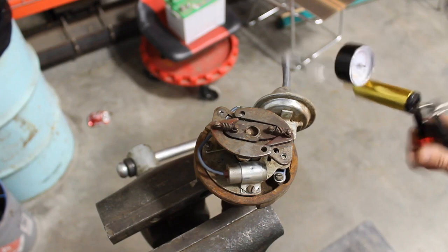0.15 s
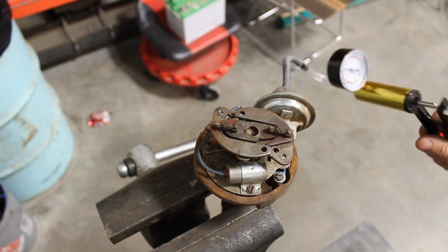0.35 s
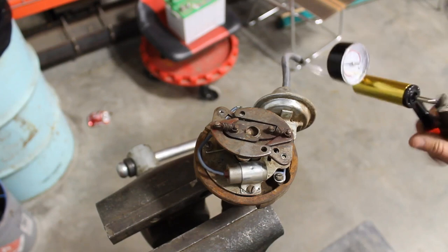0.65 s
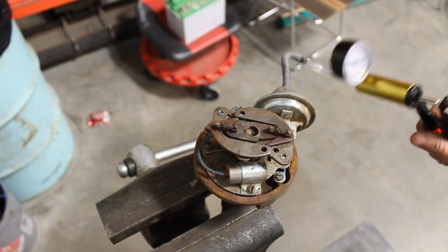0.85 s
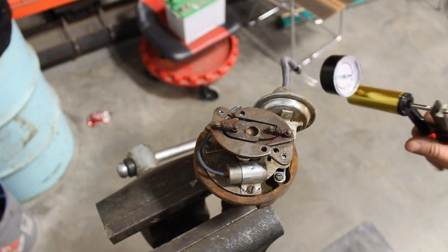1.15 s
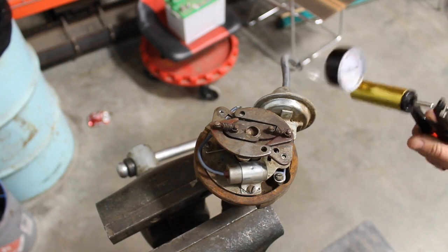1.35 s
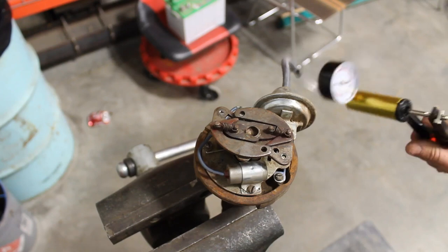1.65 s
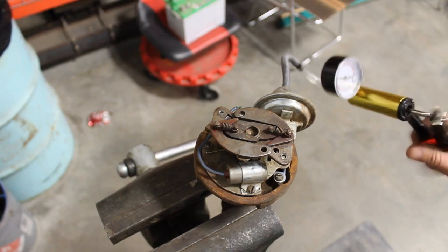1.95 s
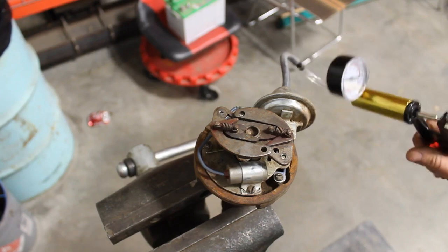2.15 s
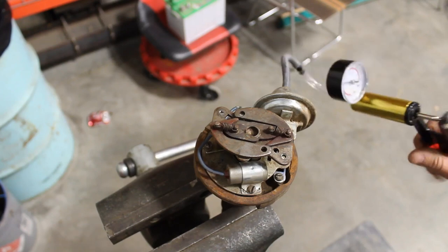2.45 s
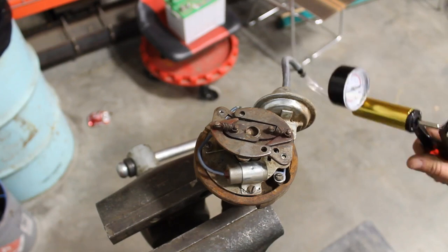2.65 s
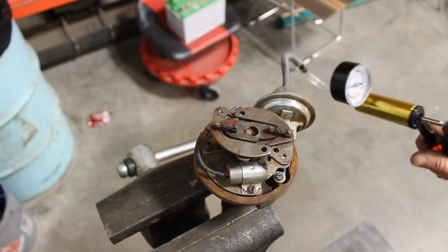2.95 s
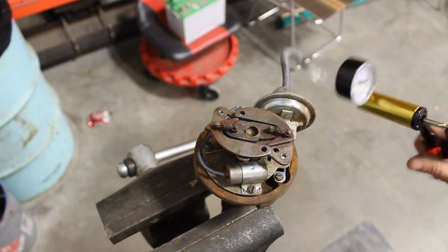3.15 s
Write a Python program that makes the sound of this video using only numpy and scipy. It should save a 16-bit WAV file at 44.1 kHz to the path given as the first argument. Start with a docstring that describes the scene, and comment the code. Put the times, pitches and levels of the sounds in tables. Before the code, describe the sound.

A pistol-grip hand vacuum pump is worked about four times a second: steel handle clack, loud low venting pop, then a small knock, tick and gritty rattle on return. Close microphone, hard-walled workshop, faint hum.

```python
"""A pistol-grip hand vacuum pump is squeezed about four times a second over quiet workshop hum and hiss.
Each squeeze clacks the steel handle, modelled as impulses and chattering contacts through resonances.
The piston then vents: a low pop from the slope of an air puff, with a short hoot around it.
On the way back come a small knock of the same kind, a band-limited valve tick and a slide of rattling grit.
Near surfaces return discrete echoes, the walls a noise tail."""
import sys
import numpy as np
from scipy import signal
from scipy.fft import rfft, irfft, next_fast_len
from scipy.io import wavfile
from scipy.ndimage import map_coordinates

SR = 44100
rng = np.random.default_rng(int(sys.argv[2]) if len(sys.argv) > 2 else 0)


def pcm_store(signal):
    """Save signal as 16-bit PCM."""
    levels = np.round(np.clip(np.atleast_2d(signal), -1, 1) * 32767)
    wavfile.write(sys.argv[1], SR, levels.astype(np.int16).T)


N = 145530

# Venting pops. Each row: puff time in seconds, pop level in dB, puff width in seconds, hoot level in dB,
# hoot pitch after its glide in Hz, hoot lead over the puff time in seconds.
VENT_POPS = [(0.2025, -3.5, 0.00042, -16, 1150, .003), (0.4724, -1.5, 0.00035, -25.5, 1100, 0.0035),
             (0.7421, -2.5, 0.00034, -23.5, 1126, 0.0076), (1.0029, -1, 0.00033, -16.5, 1114, 0.005),
             (1.2571, -1, 0.00032, -21.5, 1085, 0.0032), (1.5117, -1, 0.00031, -23.5, 1103, 0.0078),
             (1.776, -1, 0.00033, -24.5, 1055, 0.0027), (2.0425, -1.5, 0.00035, -16.5, 1120, 0.0038),
             (2.2958, -1, 0.00032, -21, 1154, 0.0038), (2.5449, 0.5, 0.00031, -10.5, 1133, 0.0029),
             (2.8116, -1, 0.00034, -21, 1106, 0.0058), (3.0712, -1, 0.00031, -24, 1055, 0.0018)]


def amp(db):
    """Gain of a level in dB."""
    return 10 ** (np.asarray(db) / 20)


def unit(x):
    """Scale to rms 1."""
    return x / np.sqrt(np.mean(x ** 2) + 1e-20)


def along(points, hz):
    """Interpolate (Hz, value) points on a log frequency axis."""
    point_hz, values = np.transpose(points)
    return np.interp(np.log(hz + 1), np.log(point_hz + 1), values)


def filtered(x, response):
    """Apply a complex response of frequency to x."""
    m = next_fast_len(N + SR // 2)
    spectrum = rfft(x, m) * response(np.fft.rfftfreq(m, 1 / SR))
    return irfft(spectrum, m)[..., :N]


def bandpass(hz, centre_hz, width_hz):
    """Response of a damped resonance, 1 at its centre."""
    return 1j * hz * width_hz / (centre_hz ** 2 - hz * hz + 1j * hz * width_hz)


def resonances(peaks):
    """One response per (Hz, width in Hz, dB) row; their joint answer to a unit blow peaks at 1."""
    def bank(hz):
        return np.array([(-1) ** k * amp(db) * bandpass(hz, centre_hz, width_hz)
                         for k, (centre_hz, width_hz, db) in enumerate(peaks)])

    unit_blow = np.arange(N) == 0
    top = np.abs(filtered(unit_blow, bank).sum(0)).max()
    return lambda hz: bank(hz) / top


def ringing(x, peaks):
    """Sum resonances driven by shared blows or one excitation each; soft contacts excite less treble."""
    contact_hz = 10260
    rung = filtered(x, resonances(peaks)).sum(0)
    return filtered(rung, lambda hz: 1 / (1 + 1j * hz / contact_hz) ** 4)


def blows(rows, db):
    """One impulse per (seconds, dB) row, all raised by db."""
    x = np.zeros(N)
    for s, level_db in rows:
        x[round(s * SR)] += amp(level_db + db)
    return x


def grit(rate_per_s, clump_db, count):
    """Tiny contacts at random moments, in clumps, partly shared by count resonances."""
    clump_rate_hz = 540
    own = 0.43  # power share of the grit that each resonance has to itself
    z = rng.standard_normal((count + 1, N)) * (rng.random((count + 1, N)) < rate_per_s / SR)
    clumps = map_coordinates(rng.standard_normal(N // 40), [np.arange(N) * clump_rate_hz / SR])
    contacts = np.sqrt(own) * z[1:] + np.sqrt(1 - own) * z[0]
    return unit(amp(clump_db * clumps) * contacts)


def shop():
    """Background: shaped noise as hiss and rumble, plus hum tones of wavering level."""
    # Noise spectrum. Each row: frequency in Hz, relative density in dB per Hz.
    spectrum = [(15, -39), (25, -0.5), (152, -2.5), (390, -1.5), (1000, -8.5), (1080, -10.5), (1380, -2),
                (1540, -8.5), (3550, -13), (4280, -11.5), (7540, -18.5), (15600, -38)]
    # Noise level. Each row: time in seconds, rms level in dB.
    noise_level = [(0.0, -43), (0.63, -47.5), (1.96, -43), (2.4, -46.5), (2.47, -45.5), (3.04, -46),
                   (3.15, -45), (3.3, -48)]
    # Hum tones. Each row: frequency in Hz, nominal level in dB.
    hum_tones = [(119, -53.5), (238, -58.5)]
    t = np.arange(N) / SR
    noise = unit(filtered(rng.standard_normal(N), lambda hz: amp(along(spectrum, hz))))
    waver = map_coordinates(rng.standard_normal(40), [t * 8])  # 8 random points a second
    hum = sum(amp(db + 1.5 + 2 * waver) * np.sin(2 * np.pi * hz * t) for hz, db in hum_tones)
    return amp(np.interp(t, *np.transpose(noise_level))) * noise + hum


def room(x):
    """Noise tail whose frequencies die at their own speeds, redrawn every quarter second."""
    # Wall absorption. Each row: frequency in Hz, 60 dB decay time in seconds.
    wall_t60 = [(150, 0.57), (500, 0.26), (1200, 0.99), (3000, 0.74), (6000, 0.28), (12000, 0.6)]
    step, shift, delay = SR // 4, 3000, 350  # samples
    out = np.zeros(N + SR)
    for i in range(0, N, step):
        hz, t, z = signal.stft(rng.standard_normal(SR // 2), SR, nperseg=256)
        decay = amp(-60 * t / along(wall_t60, hz)[:, None])
        tail = signal.istft(z * decay, SR, nperseg=256)[1]
        start = max(i - shift, 0)
        wet = signal.fftconvolve(x[start:i + step - shift], tail / np.linalg.norm(tail))
        j = start + delay
        out[j:j + len(wet)] += wet
    return out[:N]


def valve():
    """Tiny bright ticks: impulses passed twice through one band."""
    # Valve ticks. Each row: time in seconds, relative level in dB.
    tick_rows = [(0.091, -37), (0.3431, -37), (0.4544, -42), (0.6125, -34), (0.7193, -42), (0.8764, -36),
                 (1.1278, -36), (1.2364, -50), (1.3848, -37), (1.644, -38), (1.9051, -52), (2.0183, -33),
                 (2.177, -42), (2.4114, -39), (2.6843, -43), (2.9362, -39), (3.0435, -44), (3.2004, -37)]
    tick_db, tick_hz, width_hz = 18, 10900, 2300
    once = ringing(blows(tick_rows, tick_db), [(tick_hz, width_hz, 0)])
    return filtered(once, lambda hz: bandpass(hz, tick_hz, width_hz))


def slide():
    """Return slide: grit under a smooth stroke and rod rattles ring in the barrel."""
    # Return strokes. Each row: middle in seconds, relative level in dB, Gaussian half length in seconds.
    stroke_rows = [(0.084, -40, 0.014), (0.36, -36, 0.012), (0.617, -37.5, 0.016), (.888, -34.5, 0.016),
                   (1.143, -31.5, 0.0099), (1.397, -31.5, 0.014), (1.658, -28.5, .01),
                   (1.914, -31.5, 0.016), (2.191, -38.5, 0.0095), (2.42, -30.5, 0.013), (2.687, -38, 0.023),
                   (2.95, -29, 0.0097), (3.209, -37.5, 0.021)]
    # Loudest rattles of the loose piston rod. Each row: time in seconds, level in dB.
    rattle_rows = [(0.0823, -30), (0.356, -31), (0.3606, -25), (0.6267, -24.5), (0.8859, -22.5),
                   (0.8944, -25), (1.1416, -19.5), (1.3977, -24), (1.6474, -30), (1.6516, -28),
                   (1.657, -26), (1.911, -29), (1.9236, -26), (2.1914, -29), (2.4238, -20), (2.4313, -33),
                   (2.6894, -22.5), (2.6988, -28.5), (2.9407, -32), (2.9504, -39), (3.2025, -25),
                   (3.2191, -30.5)]
    # Barrel resonances. Each row: frequency in Hz, width in Hz, relative level in dB.
    barrel_peaks = [(1100, 370, -11), (1720, 660, -14), (2630, 390, -6), (3010, 155, -2), (3570, 300, -2.5),
                    (4670, 160, -2.5), (5740, 193, 0), (7380, 1750, -10.5), (9600, 1900, -17.5),
                    (11800, 700, -14.5)]
    slide_db, contacts_per_s, clump_db = -12.5, 1500, 3
    t = np.arange(N) / SR
    stroke = sum(amp(db + slide_db) * np.exp(-.5 * ((t - s) / half_s) ** 2)
                 for s, db, half_s in stroke_rows)
    scrape = stroke * grit(contacts_per_s, clump_db, count=len(barrel_peaks))
    return ringing(blows(rattle_rows, 0) + scrape, barrel_peaks)


def handle():
    """Each clack strikes the steel, which chatters on; each pop shakes it again."""
    # Handle clacks. Each row: time in seconds, relative level in dB.
    clack_rows = [(0.07, -30.5), (0.189, -14.5), (0.4464, -14.5), (0.6053, -29), (0.6973, -37),
                  (0.7115, -16.5), (0.8165, -32.5), (0.8624, -41), (0.9762, -13.5), (1.0615, -25.5),
                  (1.1269, -21), (1.2278, -15), (1.3753, -30), (1.486, -15), (1.6297, -33.5), (1.7494, -15),
                  (1.8941, -51), (2.0109, -16), (2.02, -28), (2.0976, -23), (2.1063, -42), (2.1666, -30.5),
                  (2.2689, -14.5), (2.2755, -24.5), (2.4057, -23.5), (2.5206, -13.5), (2.5264, -22.5),
                  (2.6155, -32), (2.7806, -16.5), (2.846, -30), (2.8701, -22.5), (2.878, -28),
                  (2.9278, -25), (3.037, -20), (3.0446, -23.5), (3.1036, -36), (3.1134, -48),
                  (3.1353, -21.5), (3.144, -35), (3.1916, -32), (3.2964, -24)]
    # Steel resonances. Each row: frequency in Hz, width in Hz, relative level in dB.
    steel_peaks = [(1294, 370, -7), (1800, 1500, -7.5), (2650, 400, -3), (3544, 380, -5.5), (4340, 270, -1),
                   (5294, 346, 1.5), (5990, 265, 5), (6644, 690, -1.5), (8460, 2100, -12),
                   (9900, 1700, -16)]
    clack_db, pop_shake_db = 3, -28
    chatter_db, chatter_t60_s, contacts_per_s, clump_db = -20, 0.1, 6000, 3.5
    hits = blows(clack_rows, clack_db) + blows([row[:2] for row in VENT_POPS], pop_shake_db)
    fade = amp(chatter_db - 60 * np.arange(SR // 5) / SR / chatter_t60_s)
    envelope = signal.fftconvolve(hits, fade)[:N]
    chatter = envelope * grit(contacts_per_s, clump_db, count=len(steel_peaks))
    return ringing(hits + chatter, steel_peaks)


def puffs(rows):
    """A swelling, sagging air puff radiates its slope; the vent hoots around it, gliding up."""
    pre_s, sag_s, cut_hz = .02, 0.00062, 114
    rise_s, t60_s, glide_hz, glide_s = 0.0012, 0.058, 144, 0.00067
    rough = .3  # phase wander
    overtone, overtone_db = 1.2, -14  # pitch ratio and level of a weaker second tone
    out = np.zeros(N + SR)
    u = np.arange(SR // 5) / SR - pre_s
    sag = np.exp(-np.arange(SR // 50) / SR / sag_s)
    for s, db, width_s, hoot_db, hoot_hz, lead_s in rows:
        slope = np.convolve(-u * np.exp(-.5 * (u / width_s) ** 2), sag)[:len(u)]
        v = np.maximum(u + lead_s, 0)  # seconds since hoot onset
        phase = 2 * np.pi * (hoot_hz * v + glide_hz * glide_s * np.exp(-v / glide_s))
        phase = phase + rough * np.cumsum(rng.standard_normal(len(u))) / 10
        # main tone in step with the crest of the pop
        tones = np.cos(phase - phase[slope.argmax()]) + amp(overtone_db) * np.sin(overtone * phase)
        hoot = (1 - np.exp(-v / rise_s)) * amp(-60 * v / t60_s) * tones
        i = round(s * SR) + SR // 2 - round(pre_s * SR)
        out[i:i + len(u)] += amp(db) * slope / slope.max() + amp(hoot_db) * hoot
    # two first-order low cuts, the second without phase shift
    return filtered(out[SR // 2:][:N], lambda hz: 1j * hz / (cut_hz + 1j * hz) * hz / np.hypot(cut_hz, hz))


def piston():
    """Venting pops and return knocks as air puffs, with echoes off near surfaces."""
    # Return knocks. Each row: hoot onset in seconds, relative level in dB.
    knock_rows = [(0.017, -32), (0.547, -30), (0.615, -41), (0.815, -30), (0.877, -33.5), (1.068, -31.5),
                  (1.128, -36.5), (1.324, -30), (1.387, -32), (1.582, -31.5), (1.646, -30), (1.844, -31.5),
                  (1.908, -27.5), (2.103, -32), (2.353, -32.5), (2.414, -32), (2.612, -30.5),
                  (2.875, -32.5), (2.939, -33), (3.136, -32), (3.205, -40)]
    # Near-surface echoes: one list of delays in seconds, one of signed gains.
    echo_delays_s = [.0031, .0038, .0051, .0058, .0077, .0113, .0147, .02]
    echo_gains = [0.14, 0.28, -0.11, 0.059, 0.12, -0.12, -0.058, 0.11]
    knock_db, hoot_db, hoot_hz = 6, -1.5, 975
    lag_s, width_s, spread = 0.00347, 0.00034, 0.147  # spread: random log variation of width and pitch
    vary = np.exp(spread * rng.standard_normal((len(knock_rows), 2)))
    knocks = [(s + lag_s, db + knock_db, width_s * a, db + hoot_db, hoot_hz * b, lag_s)
              for (s, db), (a, b) in zip(knock_rows, vary)]

    def echoes(hz):
        return 1 + sum(g * np.exp(-2j * np.pi * hz * d) for d, g in zip(echo_delays_s, echo_gains))

    return filtered(puffs(VENT_POPS + knocks), echoes)


def scene():
    """Sum the pump, its reverberation and the background."""
    air_wet_db, metal_wet_db = -14.5, -11.5
    air = piston()
    metal = handle() + slide() + valve()
    wet = room(amp(air_wet_db) * air + amp(metal_wet_db) * metal)
    return (air + metal + wet + shop())[None]


def record(dry):
    """Clip at full scale, then remove everything above the band limit."""
    top_hz = 15757
    return filtered(np.clip(dry, -1, 1), lambda hz: hz < top_hz)


dry = scene()
out = record(dry)
pcm_store(out)
```